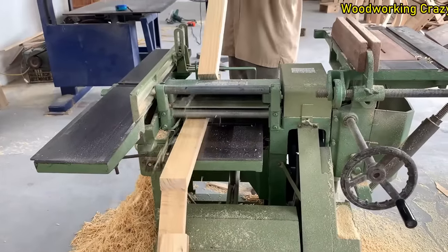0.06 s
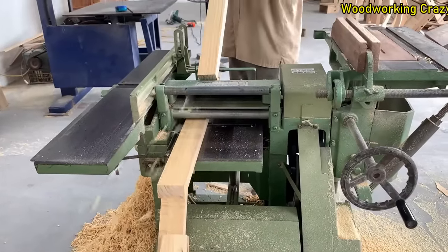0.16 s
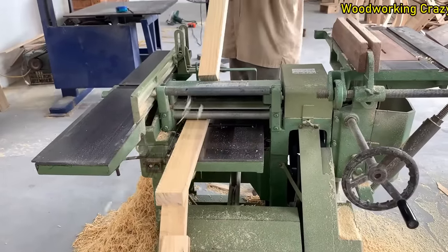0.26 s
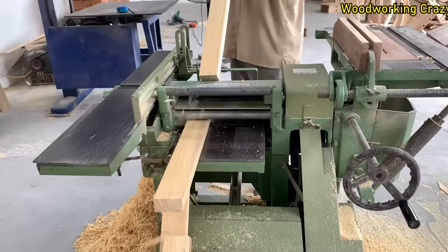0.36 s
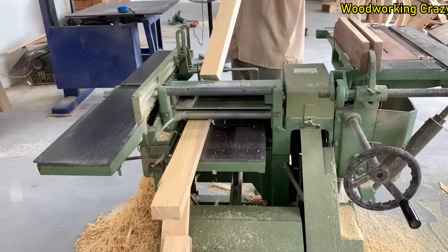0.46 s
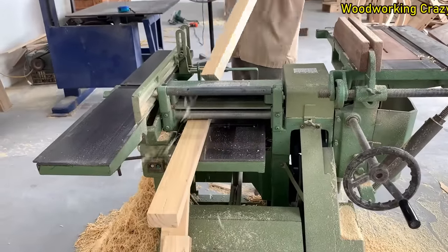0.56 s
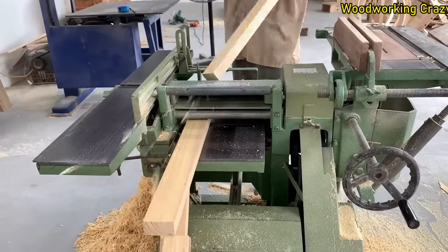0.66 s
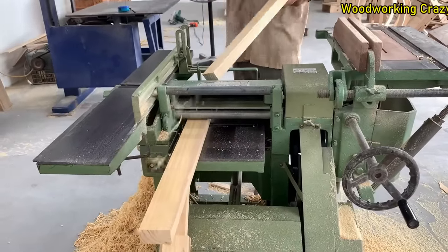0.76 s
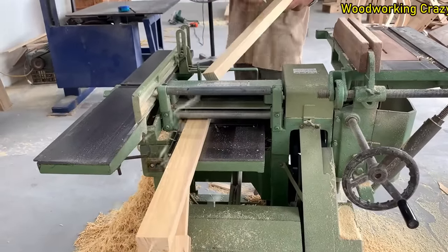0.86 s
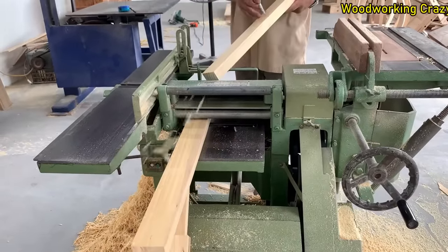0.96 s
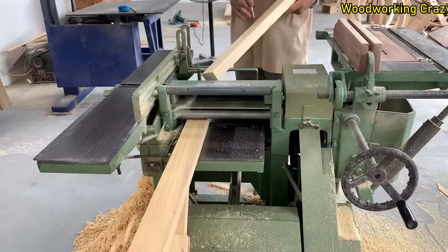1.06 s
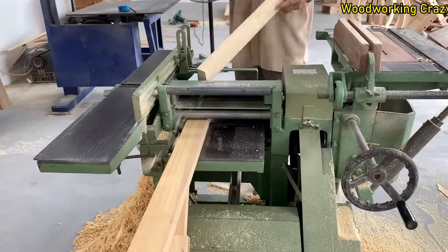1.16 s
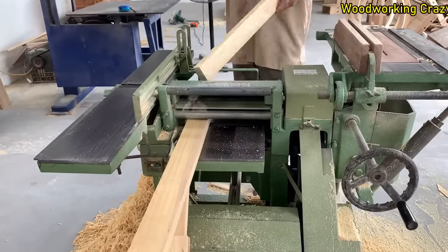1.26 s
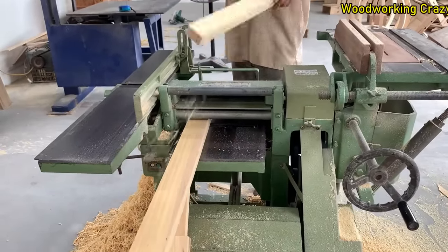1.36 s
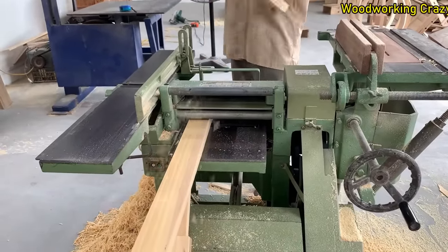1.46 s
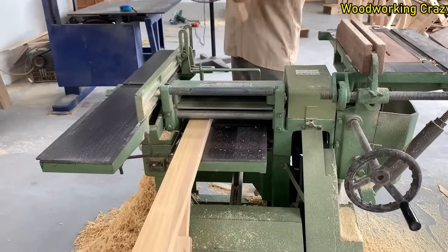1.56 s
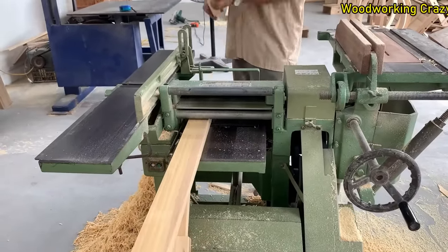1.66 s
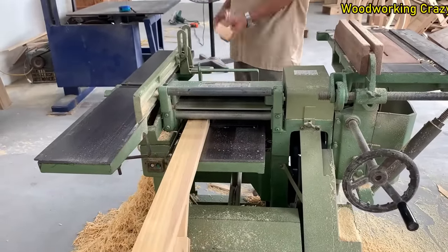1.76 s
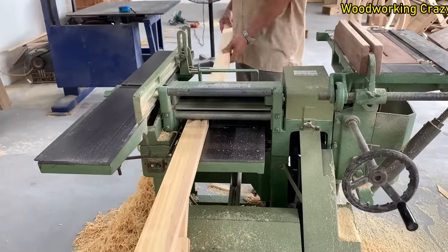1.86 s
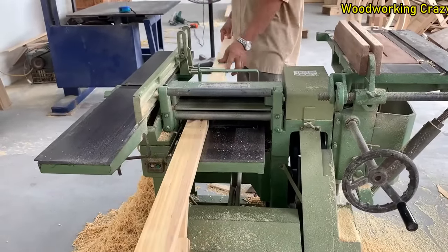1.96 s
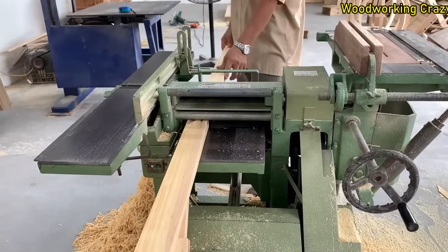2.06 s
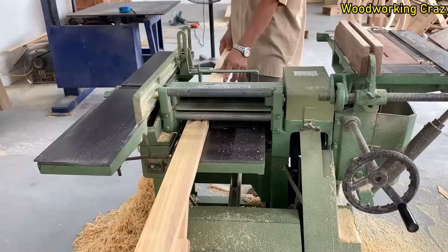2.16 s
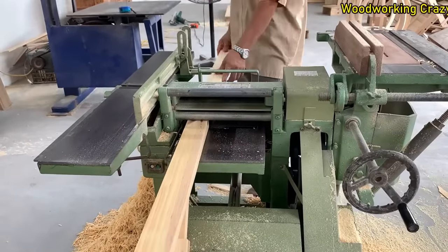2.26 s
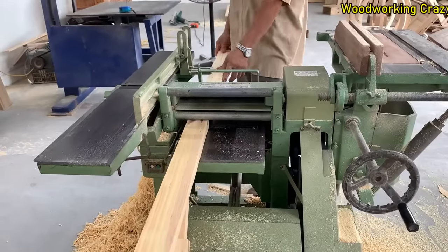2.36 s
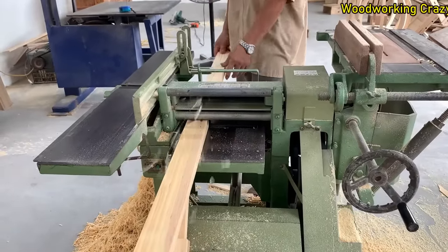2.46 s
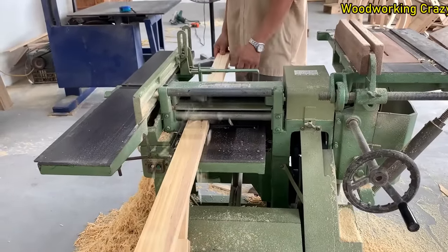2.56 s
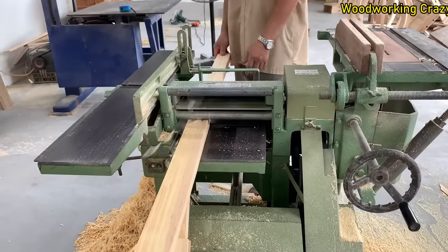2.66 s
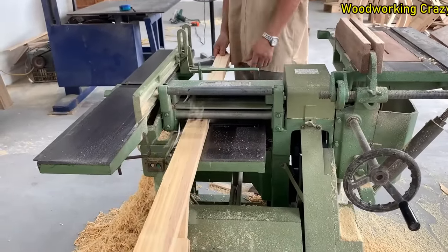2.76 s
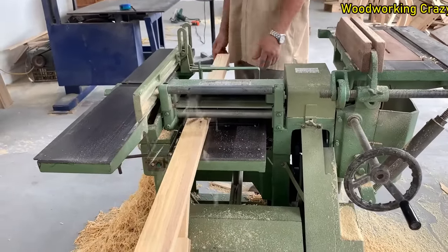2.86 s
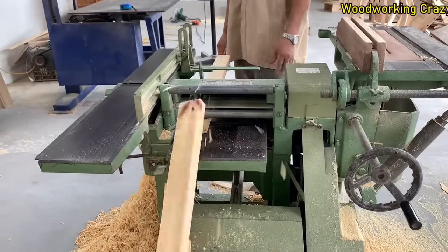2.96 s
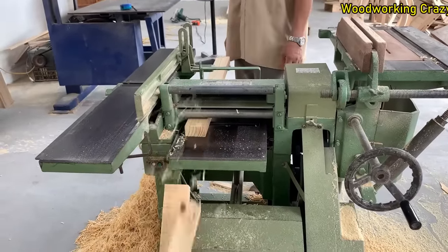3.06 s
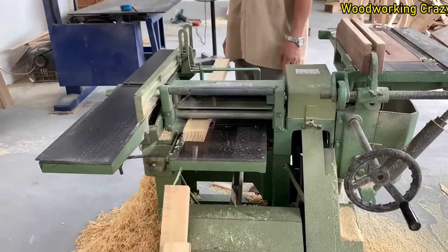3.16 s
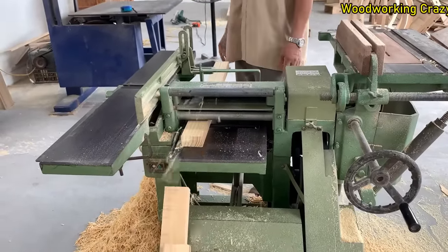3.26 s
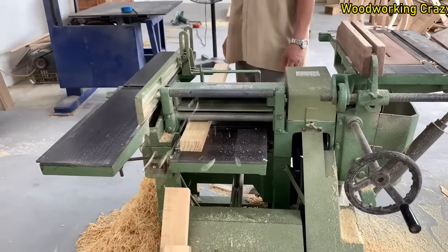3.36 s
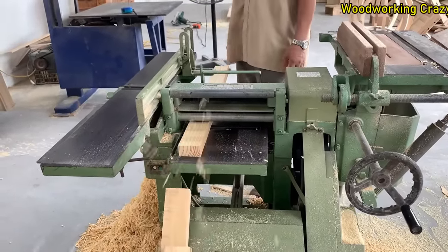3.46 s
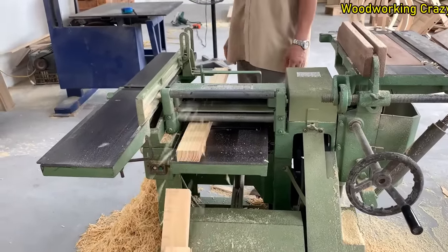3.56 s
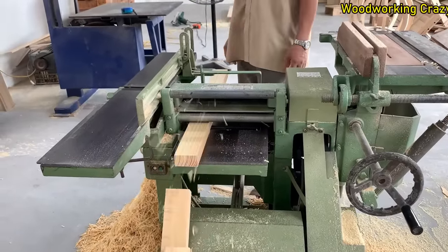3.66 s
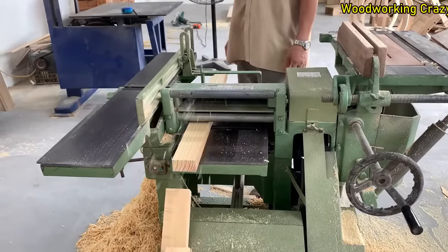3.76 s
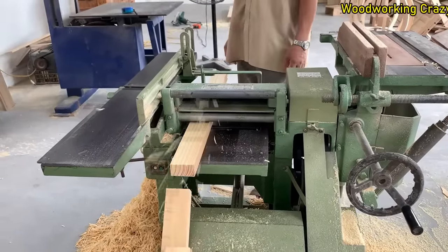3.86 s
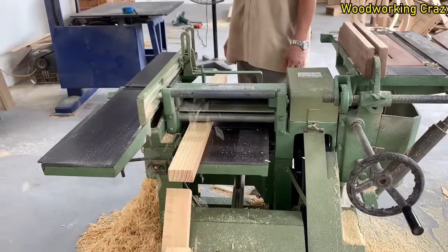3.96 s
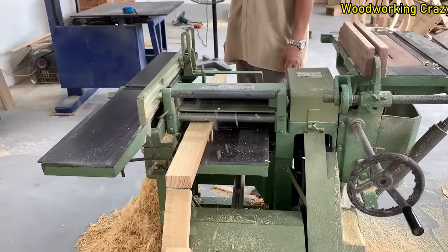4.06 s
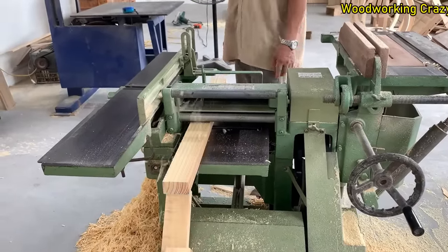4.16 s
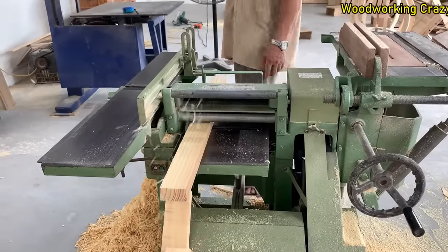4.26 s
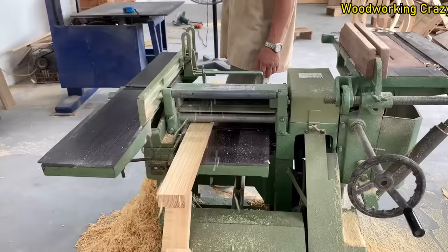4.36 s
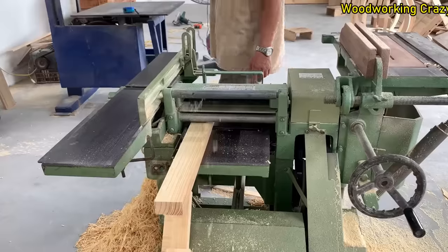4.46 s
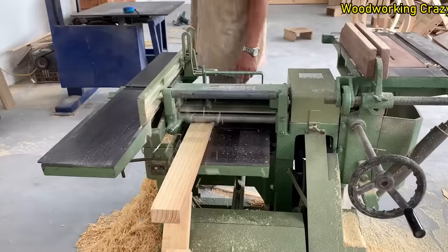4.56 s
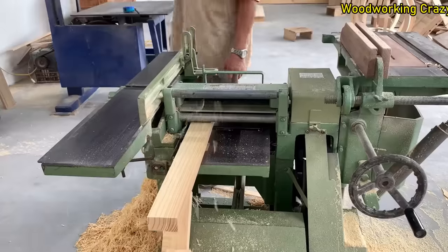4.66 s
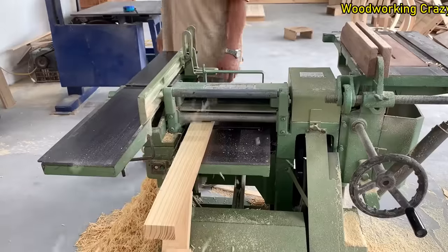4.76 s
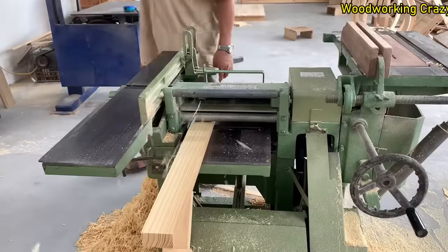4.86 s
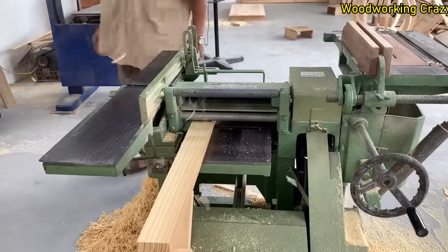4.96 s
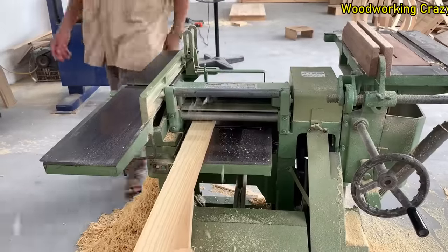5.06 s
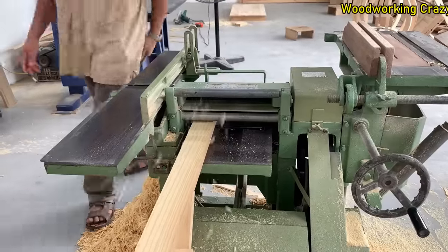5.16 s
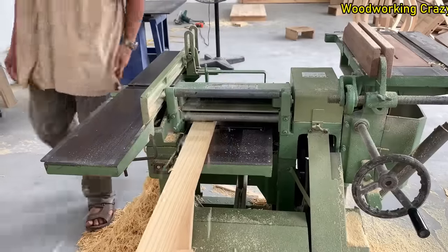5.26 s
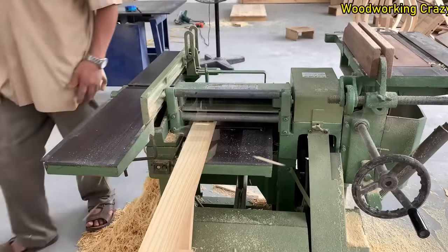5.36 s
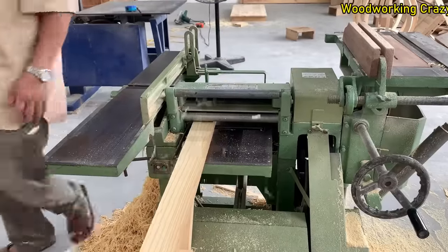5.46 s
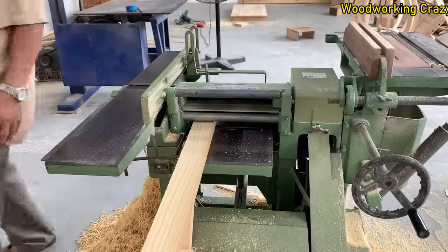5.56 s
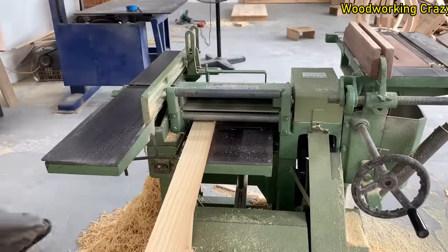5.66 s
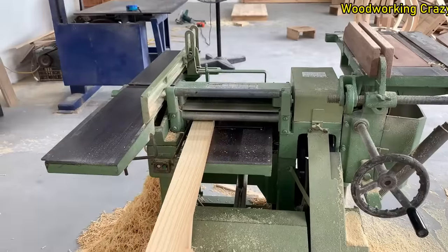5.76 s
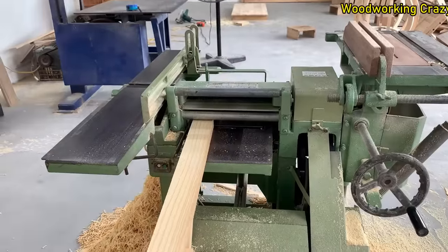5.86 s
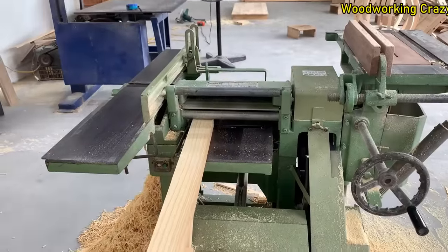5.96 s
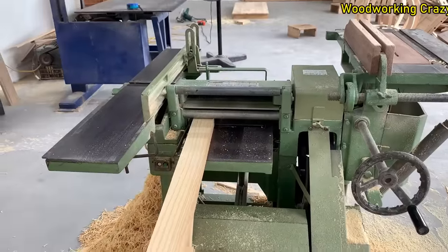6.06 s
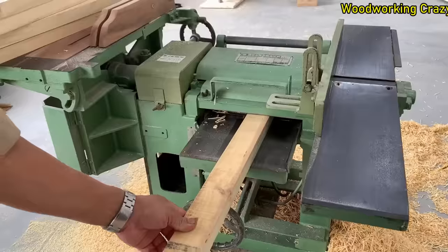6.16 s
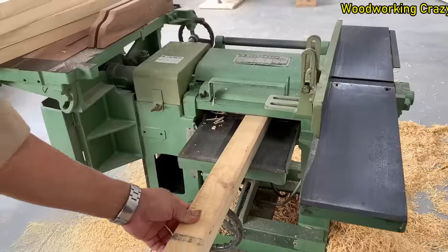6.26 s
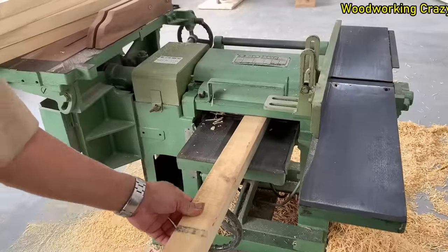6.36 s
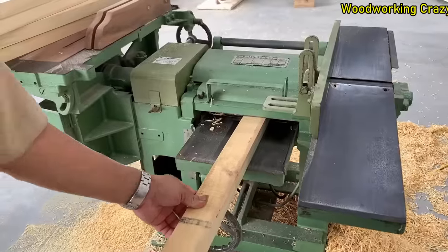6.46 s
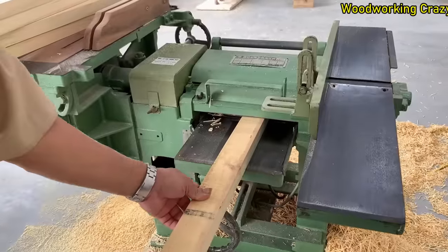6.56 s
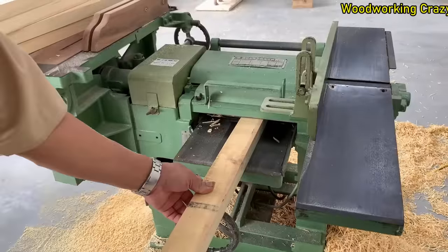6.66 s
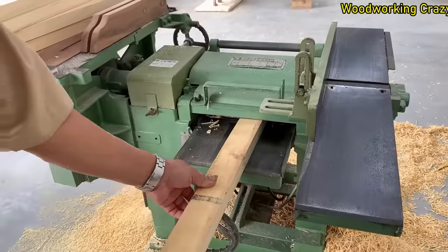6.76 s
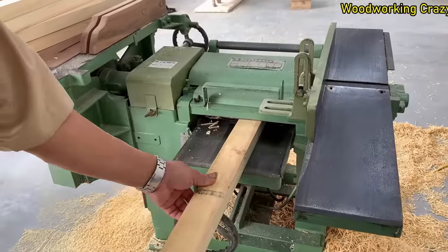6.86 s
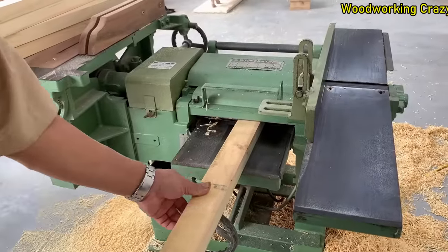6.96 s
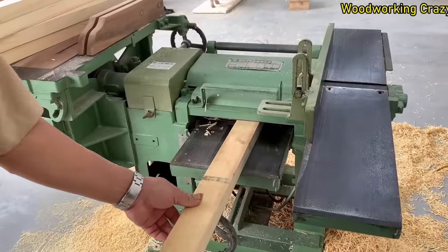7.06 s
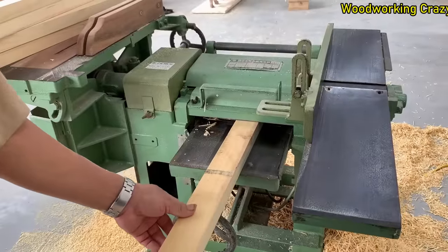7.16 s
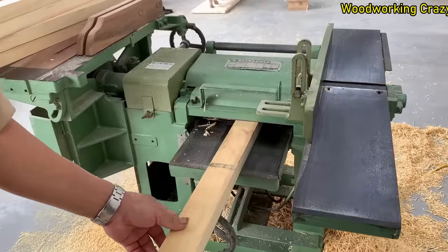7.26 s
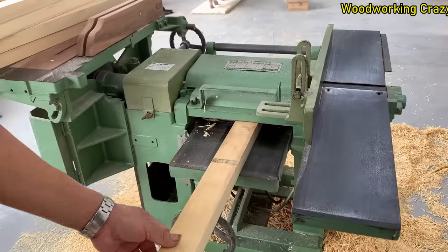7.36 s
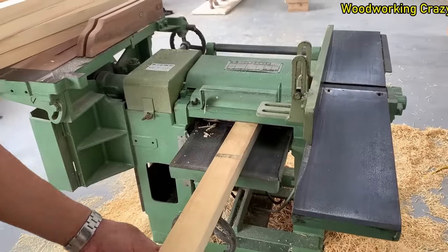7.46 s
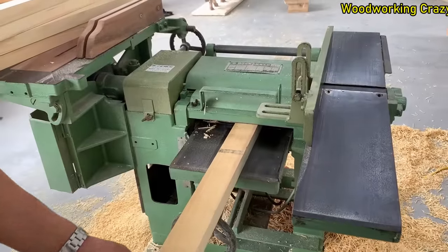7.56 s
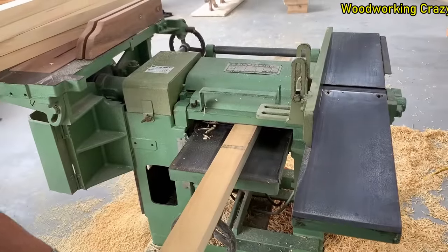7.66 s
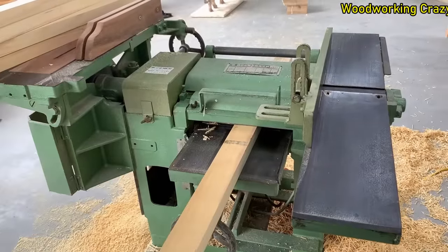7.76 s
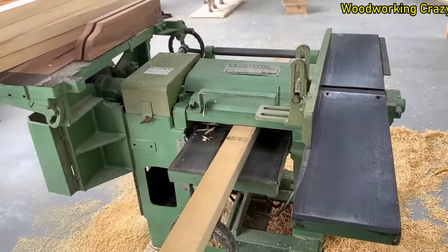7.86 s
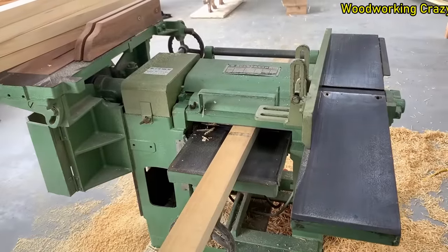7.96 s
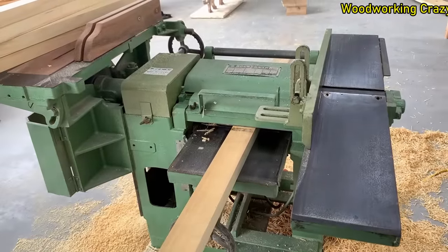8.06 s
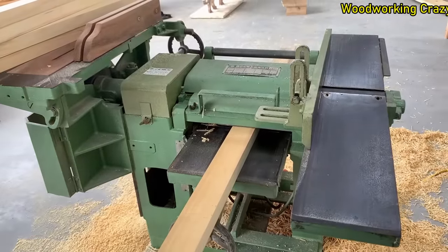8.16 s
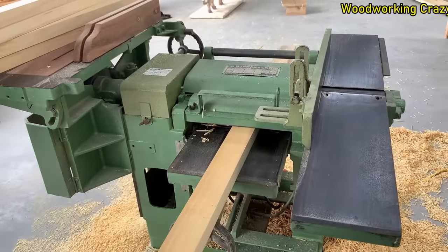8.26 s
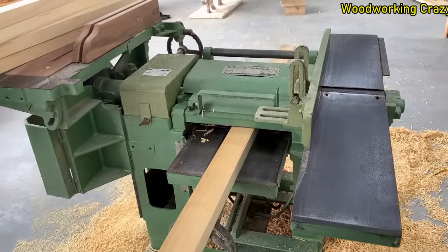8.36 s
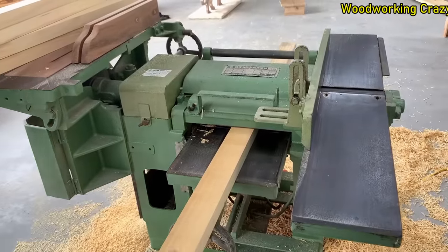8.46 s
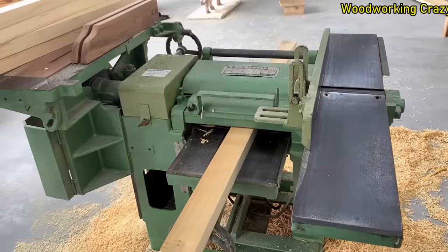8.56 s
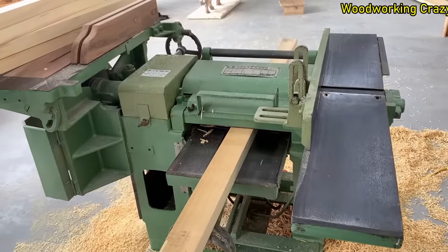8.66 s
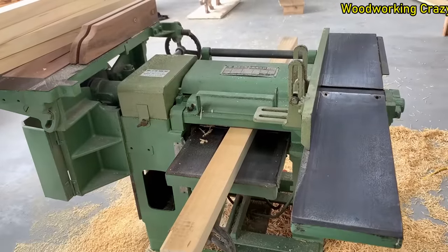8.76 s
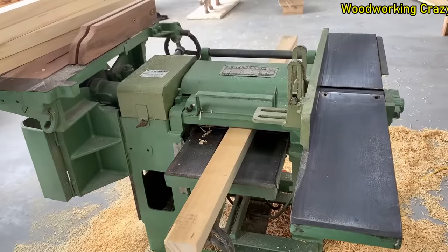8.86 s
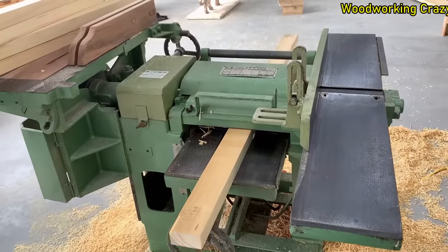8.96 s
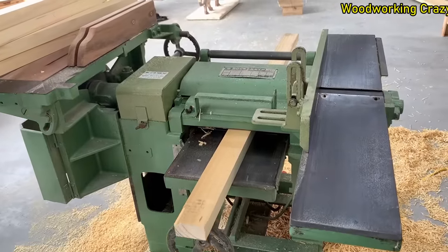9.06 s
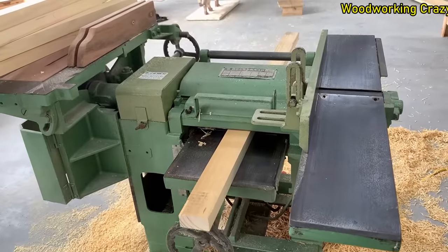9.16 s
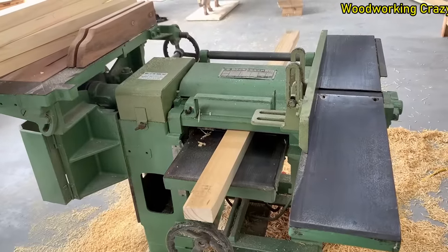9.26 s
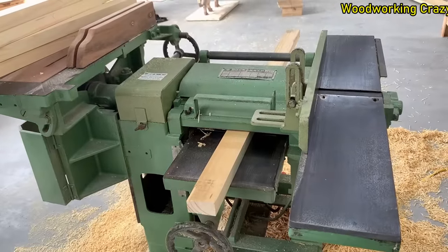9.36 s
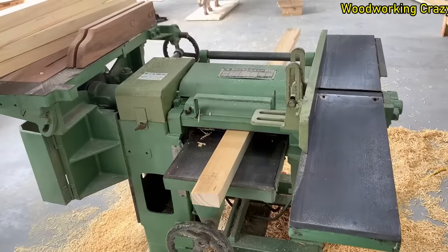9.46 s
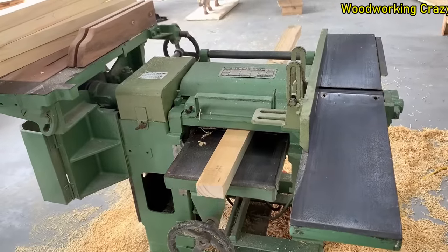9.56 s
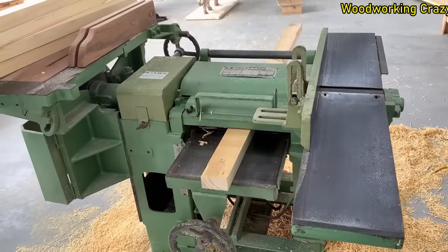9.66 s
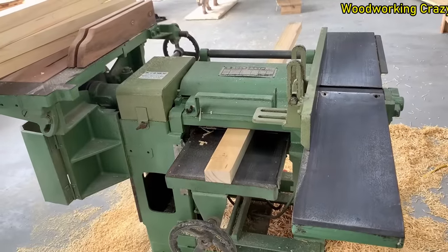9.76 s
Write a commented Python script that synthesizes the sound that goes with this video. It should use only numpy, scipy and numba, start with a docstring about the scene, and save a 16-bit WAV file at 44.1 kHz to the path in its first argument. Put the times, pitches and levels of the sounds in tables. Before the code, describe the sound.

A workshop thickness planer whines steadily as boards pass under its knives, rasping and spraying chips, with drive knocks and wooden clacks.

```python
"""A thicknesser's cutterhead whines at the knife rate in a workshop; in wood its knife strikes ring up to the treble.
Each knife also rasps the board and throws chips, as noise bursts. Heard from the outfeed side, then,
after a short gap, from the infeed side. Behind it: roar as shaped noise, belt and motor hum as wavering tones,
a whistle of the free head, a gritty hiss and thuds of air as filtered noise on the microphone.
The feed drive knocks as noise rung through the frame; boards clack down as contacts ringing wood modes."""
import sys
import numpy as np
from numba import njit
from scipy import signal
from scipy.fft import rfft, irfft, next_fast_len
from scipy.io import wavfile
from scipy.ndimage import uniform_filter1d, map_coordinates

SR = 44100
rng = np.random.default_rng(int(sys.argv[2]) if len(sys.argv) > 2 else 0)


def wav_out(sig):
    """Save sig, one row per channel (or a flat mono array), as 16-bit PCM at SR to the path in sys.argv[1]."""
    wavfile.write(sys.argv[1], SR, np.round(np.clip(np.atleast_2d(sig).T, -1, 1) * 32767).astype(np.int16))


def amplitude_ratio(level_db):
    """Convert a level in decibels to the matching linear amplitude (field) ratio."""
    exponent = np.asarray(level_db, float) / 20
    return 10 ** exponent


N = 433062  # samples

# cutterhead over time: time_s, knife_rate_hz, second_multiple_db, sixth_multiple_db
HEAD = [(0, 227.8, -42, -46), (1.1, 227.4, -42.5, -43), (1.5, 226.8, -41, -38.5), (1.65, 229, -40.5, -41),
        (1.9, 229, -46, -35.5), (2.35, 229.2, -43.5, -34.5), (2.55, 228.3, -38.5, -41),
        (2.8, 228, -38.5, -44), (3.05, 228.2, -42, -46), (3.25, 227.9, -46, -51),
        (4.4, 228.5, -44.5, -45.5), (4.8, 228.1, -45.5, -40), (5.5, 227.9, -42.5, -42),
        (5.75, 230.1, -45.5, -40), (6.21, 230.3, -59, -34.5), (6.23, 228, -47, -54),
        (6.5, 226.9, -48, -41.5), (7.15, 227.3, -45.5, -37.5), (7.7, 226.3, -56, -38.5),
        (7.85, 225.7, -66, -60), (8.07, 223.6, -38, -42), (8.3, 226, -52, -43), (8.5, 226.6, -56, -66),
        (9.0, 227.2, -52, -59), (9.3, 227.3, -56, -45), (9.82, 227, -53, -51)]
# phase by which the left port leads on the whining multiples: multiple, outfeed_rad, infeed_rad
WHINE_LEAD = [(2, -0.66, -0.33), (3, 0.4, -0.0), (4, 0.046, -0.17), (6, 0.75, -2), (8, -0.2, 1.4)]
# other whining multiples: multiple, outfeed_cutting_db, outfeed_free_db, infeed_db, infeed_fade_db_per_s
WHINE = [(3, -46.5, -48.5, -50.5, -0.7), (4, -46.5, -40, -34.5, -2), (8, -44.5, -44, -48, 0)]
# base level of the knife strikes, joined by straight lines: multiple, outfeed_db, infeed_db
STRIKE = [(5, -54, -62), (7, -65, -57), (9, -60, -50), (10, -54, -56), (11, -64, -53), (13, -50, -50),
          (14, -52, -42), (15, -52, -51), (18, -55, -53), (20, -55, -56), (22, -55, -56), (24, -62, -54),
          (27, -55, -53), (30, -59, -56), (33, -56, -53), (35, -60, -58), (36, -52.5, -56), (39, -50, -59),
          (41, -62, -63), (44, -57, -54), (48, -60, -58), (51, -55, -57), (56, -62, -64)]
# boards under the knives: enter_s, leave_s, middle_teeth_db, high_teeth_db
BOARDS = [(-1, 1.59, 0, -1), (2.44, 5.61, 1.5, 3), (6.2, 11, -2, 0)]
# the work over time, relative levels: time_s, roar_db, chip_spray_db, rasp_db
WORK = [(0, -34, -35, -43), (1, -34, -36, -41), (1.3, -33, -33, -42), (1.6, -33.5, -32, -49),
        (2.44, -32, -30.5, -38), (2.75, -32.5, -34, -37), (2.95, -32.5, -30.5, -41), (3.15, -36, -41, -43),
        (3.4, -37.5, -39, -43), (4.5, -36.5, -36, -41.5), (5.35, -35.5, -32.5, -39), (5.6, -33.5, -34, -39),
        (6.2, -31.5, -34, -45), (6.24, -33.5, -32.5, -35.5), (6.45, -33, -31, -39), (7.4, -33, -35, -39.5),
        (7.7, -33.5, -30.5, -39), (8.05, -32.5, -33, -36.5), (8.3, -32, -28, -39), (8.9, -32.5, -33.5, -39),
        (9.1, -33, -37, -37.5), (9.4, -33.5, -38, -33), (9.82, -31.5, -39, -41)]
# groups of teeth that screech for a while: start_s, end_s, centre_hz, half_width_hz, lift_db
SCREECH = [(2.439, 2.543, 8400, 900, 11), (2.55, 2.75, 3680, 200, 8), (2.56, 2.758, 6100, 400, 9),
           (2.64, 2.837, 4540, 450, 7), (2.85, 3.0, 6195, 300, 8), (5.259, 5.36, 8300, 498, 5),
           (5.26, 5.43, 5050, 200, 9), (5.33, 5.46, 4080, 400, 6), (5.36, 5.45, 2870, 250, 12),
           (5.47, 5.58, 4500, 700, 5), (6.227, 6.325, 4700, 220, 10), (6.23, 6.39, 3640, 150, 11),
           (6.24, 6.33, 6000, 350, 4), (8.055, 8.11, 3370, 149.9, 8), (7.53, 7.72, 6000, 400.6, 7.5),
           (8.0, 9.1, 5900, 300, 4), (9.3, 9.7, 5400, 300, 5), (9.33, 9.5, 4130, 200, 6)]
# relative spectrum of casing and air roar: pitch_hz, outfeed_db_per_hz, infeed_db_per_hz
ROAR = [(40, -35, -36), (80, -42, -34), (140, -25.5, -14), (250, -22.5, -16), (426, -12.5, -13.5),
        (820, -10.5, -9), (1070, -9.5, -12), (1930, -8, -9.5), (2380, -9.5, -12), (2880, -6, -7),
        (4020, -10, -12), (5200, -11.5, -12.5), (5900, -14.5, -10.5), (9100, -19, -24.5),
        (13200, -19.5, -18.5), (15200, -11.5, -15), (15900, -26, -16)]
# relative spectrum of the flying chips: pitch_hz, level_db_per_hz
SPRAY = [(3000, -23), (5000, -29), (7000, -0.5), (8500, 1), (10000, -1.5), (12000, 3), (14000, 0),
         (15800, -4)]
# relative spectrum of the rasp on the board: pitch_hz, level_db_per_hz
RASP = [(1500, -29), (3000, 1), (4200, -5.5), (5500, 1.5), (6400, -3.5), (7500, -38), (10000, -35)]
# likeness of noise at the two ports: pitch_hz, correlation
LIKENESS = [(60, .1), (130, 0.35), (290, 0.67), (640, 0.75), (1400, 0.42), (3100, 0.42), (6800, 0.083),
            (12000, 0.29)]
# belt and motor tones, mean levels: pitch_hz, outfeed_db, infeed_db
HUM = [(195.4, -70, -66), (260.5, -62, -61), (325.6, -66, -64), (521, -51.5, -60), (586, -58, -60),
       (765, -56, -54), (838, -57, -57), (1210, -58, -63), (1722, -54, -58)]
# runs of feed drive knocks, relative levels: first_s, last_s, first_db, last_db
KNOCKS = [(.25, .481, -27, -20.5), (.604, .604, -16.5, -17.5), (.9494, 1.4042, -25, -19.5),
          (1.491, 1.491, -19, -18.5), (2.3101, 2.3101, -22.5, -35), (2.523, 2.523, -31, -25),
          (3.3134, 3.8931, -23.5, -20), (4.0098, 4.2438, -20, -23.5), (4.702, 4.9305, -23.5, -26),
          (5.125, 5.125, -26, -26), (5.3394, 5.3394, -22.5, -20), (5.6793, 5.7857, -19.5, -20),
          (6.174, 6.1738, -21, -20.5), (8.0524, 8.1405, -20, -24)]
# resonances of the machine frame: pitch_hz, width_hz, level_db
FRAME = [(1240, 370, -4), (1780, 390, 2), (2426, 300, 2), (2920, 240, 0), (3154, 1180, 3), (3960, 760, -2),
         (6300, 1570, -3)]
# boards knocking onto the stack:
# start_s, level_db, rattle_hold_s, rattle_t60_s, loudest_ring_hz, crack_over_ring_db
CLACKS = [(9.031, -25.5, .015, 0.099, 1899, -12), (9.134, -8.5, 0.003, .04, 2150, 4),
          (9.141, -11.5, .022, 0.23, 2040, -1), (9.17, -22, .012, 0.27, 1880, -6),
          (9.2365, -13, .004, .04, 3000, 6), (9.238, -14, .035, .16, 3280, -3),
          (9.24, -13, .014, .08, 2100, -5), (9.251, -11.5, .022, 0.3, 1700, -9),
          (9.323, -22, 0.012, .14, 3300, -6), (9.753, -18, .003, 0.051, 3300, 0),
          (9.777, -19, 0.028, .3, 1598, -10)]
# a plank dropping free (loudest_ring_hz counts only where pitch_factor is below 1):
# start_s, level_db, rattle_hold_s, rattle_t60_s, loudest_ring_hz, crack_over_ring_db, pitch_factor
DROPS = [(3.0385, -18, 0, .025, 1750, 14, 1.), (3.0435, -9.5, .006, .06, 3300, 11, 1.),
         (3.11, -25, .015, .1, 3300, 13, 1.), (3.375, -22.5, .006, .035, 1230, 11, .7)]
# modes of the free plank at pitch_factor 1: pitch_hz, level_db, t60_s
PLANK = [(1080, -9, .05), (1723, 6.5, .25), (1795, 5.5, .2), (2100, 2, .025), (2400, 1, .025),
         (2880, 0, .07), (3310, 6, .07), (3980, -9, .06), (4555, -8, .08), (5000, -1, .11), (5350, -4, .06),
         (6200, -1, .04), (7600, -3, .05)]
# modes of the stack: pitch_hz, level_db, t60_s
STACK = [(1566, -5, 0.06), (1720, 1, 0.05), (1880, -1.5, 0.045), (2050, 1.5, 0.04), (2280, -3, 0.03),
         (2510, -1.5, 0.018), (2730, -3.5, .02), (3230, 2.5, 0.035), (3410, -1, .045), (4110, -4, 0.036),
         (5370, -4, .02), (6260, 0, .02)]
# thuds of air: start_s, relative_level_db, centre_hz
PUFFS = [(6.624, -29, 320.4), (6.665, -37, 140), (6.75, -32, 331), (7.075, -40, 149.5), (7.288, -29, 299),
         (7.51, -30.5, 179.5), (7.76, -30.5, 300.4), (7.79, -37, 170.2), (8.208, -33.5, 148.6),
         (8.248, -32, 315), (8.453, -32.5, 323.2), (8.516, -31, 365), (8.578, -37.5, 188),
         (8.913, -34, 278), (8.963, -34, 200), (9.016, -35, 306.4), (9.54, -33.5, 266),
         (9.613, -31.5, 254.4), (9.679, -32, 276.6)]
# left port over right: pitch_hz, balance_db
BALANCE = [(100, 0.5), (350, -2), (800, -0.7), (1500, -.4), (3000, 1), (6000, 1), (10000, -0.7),
           (14000, -.8)]

GAP_START_S, GAP_END_S, GAP_DB = 6.212, 6.2295, -28  # the dip between the two standpoints
OUTFEED_PAN_DB, INFEED_PAN_DB = -0.84, 0.1  # left over right
PORT_LAG_S = 1.9e-5
STEP = 256  # samples between control points
T = np.arange(N) / SR
INFEED = T > (GAP_START_S + GAP_END_S) / 2
CONTROL_T, CONTROL_INFEED = T[::STEP], INFEED[::STEP]
FFT_SIZE = next_fast_len(N)
SPECTRUM_HZ = np.arange(FFT_SIZE // 2 + 1) * SR / FFT_SIZE + 1  # 1 Hz up, so that its log exists


def slow(rate, count=1, step=1):
    """Smooth random levels with spread about 1, changing about rate times a second."""
    knots = rng.standard_normal((count, int(N / SR * rate) + 3))
    smooth = (knots[:, 1:] + knots[:, :-1]) / np.sqrt(2)
    places = np.arange(smooth.shape[1])
    return np.squeeze([np.interp(T[::step] * rate, places, row) for row in smooth])


def unit(x):
    """Scale to rms 1."""
    return x / np.sqrt(np.mean(x ** 2))


def back(spectrum):
    """Spectrum to sound."""
    return irfft(spectrum, FFT_SIZE)[:, :N]


def add(out, start_s, sound):
    """Mix a short sound in at its start time."""
    start = int(start_s * SR)
    out[:, start:start + sound.shape[1]] += sound[:, :N - start]


def colour(points):
    """Gain over SPECTRUM_HZ, joined in dB over log frequency."""
    hz, db = np.transpose(points)
    return amplitude_ratio(np.interp(np.log(SPECTRUM_HZ), np.log(hz), db))


def port_noise():
    """Spectra of white noise at the two microphone ports, as alike in each band as LIKENESS says."""
    hz, likeness = np.transpose(LIKENESS)
    like = np.clip(np.interp(np.log(SPECTRUM_HZ), np.log(hz), likeness), 0, 1)
    shape = (2, len(SPECTRUM_HZ))
    mid, side = rng.standard_normal(shape) + 1j * rng.standard_normal(shape)
    sign = np.array([[1], [-1]])
    lag = np.exp(1j * np.pi * SPECTRUM_HZ * PORT_LAG_S * sign)  # the right port hears it later
    return (np.sqrt((1 + like) / 2) * mid + np.sqrt((1 - like) / 2) * side * sign) * lag


def ringing(modes):
    """Noise heard through a set of resonances."""
    gain = sum(amplitude_ratio(db) / (1 + 2j * (SPECTRUM_HZ - hz) / width) ** 2 for hz, width, db in modes)
    return unit(back(port_noise() * gain))


def patchy(x, share=1):
    """Resonances shift as a board travels: each stretch of the spectrum swells and sinks on its own."""
    patch_hz, patches_per_s, depth_db = 600, 6, 3.5
    hz, t, z = signal.stft(x, SR, nperseg=512)
    field = rng.standard_normal((int(hz[-1] / patch_hz) + 2, int(t[-1] * patches_per_s) + 2))
    places = np.meshgrid(hz / patch_hz, t * patches_per_s, indexing="ij")
    db = share * depth_db * map_coordinates(field, places, order=1)
    return unit(signal.istft(z * amplitude_ratio(db), SR, nperseg=512)[1][:, :N])


def grit(size, spread_db):
    """Gains of single small contacts, a few much harder than the rest."""
    hold = int(0.0012 * SR)  # length of one contact
    hardness_db = spread_db * rng.exponential(size=size // hold + 1)
    return np.repeat(amplitude_ratio(np.minimum(hardness_db, 3 * spread_db)), hold)[:size]


def blows(rows, rise_s, t60_s):
    """Envelope of (start_s, level_db) blows: quick rise, exponential fall."""
    env = np.zeros(N)
    for start_s, db in rows:
        start = int(start_s * SR)
        t = T[start:int((start_s + 1.5 * t60_s) * SR)] - start_s
        env[start:start + len(t)] += amplitude_ratio(db - 60 * t / t60_s) * (1 - np.exp(-t / rise_s))
    return env


def pair(db, lead):
    """Complex gain of a tone of this rms level at both ports, the left ahead by lead radians."""
    return np.sqrt(2) * amplitude_ratio(db) * np.exp(.5j * np.array([lead, -lead]))


@njit(fastmath=True)
def comb(phase, gains, step):
    """Sum of multiples of a phase; complex gains[control point, port, multiple - 1] glide between points."""
    out = np.zeros((2, len(phase)))
    for i in range(len(phase)):
        j = min(i // step, len(gains) - 2)
        share = i / step - j
        turn = np.exp(1j * phase[i])
        z = turn
        for k in range(gains.shape[2]):
            for c in range(2):
                out[c, i] += (z * (gains[j, c, k] + share * (gains[j + 1, c, k] - gains[j, c, k]))).imag
            z *= turn
    return out


def roar(roar_db):
    """Wind of the head, bearings and casing: bands that flicker apart; the bass flickers and swells most."""
    white = port_noise()
    swell = 0.27 * (roar_db - roar_db.mean())
    out = 0
    for column, side in ((1, ~INFEED), (2, INFEED)):
        shaped = white * colour(np.array(ROAR)[:, [0, column]])
        for centre_hz, flicker_db in [(60, 7.5), (240, 1.6), (960, .9), (3840, .8)]:
            octaves = np.log2(np.minimum(SPECTRUM_HZ, 3840) / centre_hz)  # the last band takes all the treble
            band = np.cos(np.pi / 2 * np.clip(octaves / 2, -1, 1)) ** 2
            out = out + side * back(shaped * band) * amplitude_ratio(flicker_db * (slow(7) + swell))
    return unit(out) * amplitude_ratio(roar_db + 3.0)


def hum():
    """Belt and motor tones, slightly wavering in level and phase, alike at both ports."""
    def waver(rate):
        return np.repeat(slow(rate, count=len(HUM), step=STEP), STEP, axis=1)[:, :N]

    out = 0
    for (hz, outfeed_db, infeed_db), level, drift in zip(HUM, waver(4), waver(6)):
        db = np.where(INFEED, infeed_db, outfeed_db) + 3.2 * level
        phase = 2 * np.pi * hz * T + 1.12 * uniform_filter1d(drift, size=STEP)
        out = out + np.sqrt(2) * amplitude_ratio(db) * np.sin(phase)
    return out


def whistle(in_wood):
    """The free-running head whistles: noise in one narrow resonance, silent while a board is cut."""
    tone = ringing([(10880, 60, 0)])  # pitch_hz, width_hz, level_db
    return (1 - in_wood) * tone * amplitude_ratio(-57 + 3.9 * slow(7.7))


def hiss():
    """Gritty noise in one broad resonance swells, holds and stops."""
    start_s, end_s, rise_s = 5.5, 6, 0.14
    noise = ringing([(4000, 3000, 0)]) * unit(grit(N, 2))  # pitch_hz, width_hz, level_db
    return noise * amplitude_ratio(-32 + 2 * slow(11)) * np.clip((T - start_s) / rise_s, 0, 1) * (T < end_s)


def puffs():
    """Short low thuds of air: band noise with a quick rise and exponential fall, each with its own centre."""
    out, t = np.zeros((2, N)), np.arange(SR // 6) / SR
    envelope = amplitude_ratio(-60 * t / 0.15) * (1 - np.exp(-t / 0.0065))
    for start_s, db, hz in PUFFS:
        air = 0.79 * rng.standard_normal(len(t)) + 0.32 * rng.standard_normal((2, len(t)))
        band = signal.butter(2, [0.56 * hz, 1.56 * hz], "band", fs=SR, output="sos")
        add(out, start_s, unit(signal.sosfilt(band, air) * envelope) * amplitude_ratio(db - 12))
    return out


def knocks():
    """Each chain link strikes the frame: a tick, then a gritty ring; loose chips tick on it at the outfeed."""
    beat_s, ticks_per_s, tick_db, spread_db = 0.115, 100, -41, 2.5
    rows = []
    for first_s, last_s, first_db, last_db in KNOCKS:
        count = round((last_s - first_s) / beat_s) + 1
        rows.extend(np.linspace((first_s, first_db), (last_s, last_db), count))
    when, chance = rng.random((2, int(ticks_per_s * GAP_START_S)))
    ticks = np.transpose([when * GAP_START_S, tick_db - spread_db * np.log(chance + 0.069)])
    links = blows(rows, 0.0022, 0.25) * amplitude_ratio(-8.0) + blows(rows, 0.00023, 0.052) * amplitude_ratio(-13)
    links = links * unit(grit(N, spread_db / 2))
    return patchy(ringing(FRAME), share=.5) * (links + blows(ticks, 0.0006, 0.055))


def struck_wood(modes, free, hold_s, t60_s, loudest_hz, crack_db, factor):
    """A gritty rattle of contacts cracks out and drives decaying modes; a free plank cracks wider."""
    t = np.arange(SR // 4) / SR
    noise = rng.standard_normal(len(t)) + 1.47 * rng.standard_normal((2, len(t)))
    fall = amplitude_ratio(-60 * np.maximum(t - hold_s, 0) / t60_s)
    contacts = noise * grit(len(t), 2.2) * fall * (1 - np.exp(-t / 0.0006))
    drive = contacts.copy()
    if free:  # one firm blow sets a free plank ringing
        drive[:, int(hold_s * SR)] += np.sqrt(np.mean(np.sum(contacts ** 2, axis=1)))
    focus_db_per_octave = 11 if factor < 1 or not free else 0  # modes fall off away from the loudest
    ring = 0
    for mode_hz, mode_db, ring_s in modes:
        hz, decay_s = mode_hz * factor, ring_s * factor ** 2
        pole = np.exp(2j * np.pi * hz / SR - np.log(1000) / (decay_s * SR))
        gain = amplitude_ratio(mode_db - focus_db_per_octave * abs(np.log2(hz / loudest_hz)))
        ring = ring + gain * np.sqrt(1 - abs(pole)) * signal.lfilter([1], [1, -pole], drive).imag
    crack_band = signal.butter(3, (900, 7000) if free else (1700, 4600), "band", fs=SR, output="sos")
    low_cut = signal.butter(6, 700 if free else 1500, "high", fs=SR, output="sos")
    sound = signal.sosfilt(low_cut, ring + amplitude_ratio(crack_db) * signal.sosfilt(crack_band, contacts))
    return sound / np.sqrt(uniform_filter1d(sound ** 2, size=440).max())  # loudest 10 ms at rms 1


def clacks():
    """A plank drops free and boards knock onto the stack, each ringing the modes of what is struck."""
    out = np.zeros((2, N))
    for start_s, db, *blow in DROPS:
        add(out, start_s, amplitude_ratio(db - 5.5) * struck_wood(PLANK, True, *blow))
    for start_s, db, *blow in CLACKS:
        add(out, start_s, amplitude_ratio(db - 5.5) * struck_wood(STACK, False, *blow, 1))
    return out


def chips(phase, spray_db, rasp_db):
    """Each knife rasps the board and throws a burst of chips, a few cuts much heavier than the rest."""
    cuts = phase / (2 * np.pi)
    cut = cuts.astype(int)
    heavy = amplitude_ratio(np.minimum(3.2 * rng.exponential(size=cut[-1] + 1), 11.5))[cut]
    burst = unit(0.5 + heavy * np.exp(-(cuts % 1) / 0.34))
    white = port_noise()
    spray, rasp = (patchy(back(white * colour(points))) for points in (SPRAY, RASP))
    return burst * (spray * amplitude_ratio(spray_db + 1.9 * slow(8)) + rasp * amplitude_ratio(rasp_db + 1.4 * slow(9)))


def groan_db(k):
    """Least level of a multiple: a knot makes the head groan on multiples 8 to 12."""
    knot_s, half_s = 8.07, 0.085
    return -40.5 - 6 * ((CONTROL_T - knot_s) / half_s) ** 4 if 8 <= k <= 12 else -99


def screech_db(tooth_hz):
    """Lift of a tooth while a group of teeth around it screeches."""
    lift_db = 0
    for start_s, end_s, centre_hz, half_width_hz, db in SCREECH:
        gate = np.clip(np.minimum(CONTROL_T - start_s, end_s - CONTROL_T) / .03 + .5, 0, 1)
        lift_db = lift_db + db * np.exp(-((tooth_hz - centre_hz) / half_width_hz) ** 2) * gate
    return lift_db


def air_whine(in_wood, roar_db):
    """Levels of the air whine by multiple; on the outfeed side three of them change as boards enter and leave."""
    settle_s, db_per_roar_db = 0.3, 0.92
    cutting = uniform_filter1d(1. * in_wood, size=int(settle_s * SR))[::STEP]
    swell_db = db_per_roar_db * (roar_db - roar_db.mean())[::STEP]
    time_s, _, second_db, sixth_db = np.transpose(HEAD)
    levels = {2: np.interp(CONTROL_T, time_s, second_db), 6: np.interp(CONTROL_T, time_s, sixth_db)}
    for k, cut_db, free_db, infeed_db, fade in WHINE:
        outfeed = free_db + cutting * (cut_db - free_db + swell_db)
        infeed = infeed_db + fade * (CONTROL_T - GAP_END_S)
        levels[int(k)] = np.where(CONTROL_INFEED, infeed, outfeed)
    return levels


def cutterhead(in_wood, roar_db, rasp_db, spray_db):
    """Air whine on low multiples of the knife rate; in wood a full comb whose teeth drift as the board travels."""
    time_s, knife_hz, *_ = np.transpose(HEAD)
    phase = 2 * np.pi * np.cumsum(np.interp(T, time_s, knife_hz) * (1 + .0002 * slow(30))) / SR
    gains = np.zeros((len(CONTROL_T), 2, int(STRIKE[-1][0])), complex)

    whine = air_whine(in_wood, roar_db)
    for k, outfeed_lead, infeed_lead in WHINE_LEAD:
        k = int(k)
        db = np.maximum(whine[k], groan_db(k)) + 1.4 * slow(14, step=STEP)
        gains[:, :, k - 1] = pair(db, np.where(CONTROL_INFEED, infeed_lead, outfeed_lead)).T

    boards = np.array(BOARDS)
    board = boards[np.searchsorted(boards[:, 0], CONTROL_T) - 1]  # the last to enter
    # middle teeth grow with the rasp, high teeth with the spray, from their usual levels
    middle_db = 1.4 * (rasp_db[::STEP] + 41) + board[:, 2]
    high_db = 0.4 * (spray_db[::STEP] + 35) + board[:, 3]
    multiple, *sides_db = np.transpose(STRIKE)
    for k in sorted(set(range(int(multiple[0]), int(multiple[-1]) + 1)) - set(whine)):
        parity_db = 2.5 * (.5 - k % 2) - 2 * (k in (16, 17))  # even multiples stand above odd ones
        outfeed_db, infeed_db = (np.interp(k, multiple, side) + parity_db for side in sides_db)
        db = np.where(CONTROL_INFEED, infeed_db, outfeed_db)
        if k > 15:
            db = db + (high_db if k > 28 else middle_db)
        drift, flutter, turn = slow(6, step=STEP), slow(16, step=STEP), slow(2.5, step=STEP)
        lift_db = screech_db(k * knife_hz[0])
        loose = amplitude_ratio(-lift_db)  # a screeching tooth holds steadier
        db = db + lift_db + (3.2 if k > 15 else 1.6) * drift * loose
        db = np.maximum(np.minimum(db, -40), groan_db(k)) + 2 * flutter
        # the ports hear each tooth by different paths
        lead = np.where(CONTROL_INFEED, 0.75 * turn, 0.03 * k + 0.49 * turn) * np.sqrt(loose)
        # teeth nearly in step add up to a blow per knife; each wavers
        waver = np.exp(2.4j * rng.random() + (.3j + .012j * k) * slow(25, step=STEP))
        gains[:, :, k - 1] = (in_wood[::STEP] * pair(db, lead) * waver).T
    return comb(phase, gains, STEP), phase


def scene():
    """The machine, its boards and the gap between the standpoints."""
    time_s, *columns = np.transpose(WORK)
    roar_db, spray_db, rasp_db = (np.interp(T, time_s, column) for column in columns)
    in_wood = sum(np.clip(np.minimum(T - enter_s, leave_s - T) / .02, 0, 1) for enter_s, leave_s, *_ in BOARDS)
    head, phase = cutterhead(in_wood, roar_db, rasp_db, spray_db)
    background = roar(roar_db) + hum() + whistle(in_wood) + hiss() + puffs()
    out = background + knocks() + clacks() + in_wood * chips(phase, spray_db, rasp_db) + head
    pan_db = np.where(INFEED, INFEED_PAN_DB, OUTFEED_PAN_DB) * np.array([[.5], [-.5]])
    gap = np.where((T > GAP_START_S) & (T < GAP_END_S), amplitude_ratio(GAP_DB), 1)
    return out * amplitude_ratio(pan_db) * gap


def band_limit(x):
    """A steep low-pass at the top of the band."""
    return signal.sosfilt(signal.butter(12, 16810, fs=SR, output="sos"), x)


def record(dry):
    """A gentle bass cut and a steep top limit at 15.75 kHz; the two ports differ a little in colour."""
    tilt = np.sqrt(colour(BALANCE))
    mix = back(rfft(dry, FFT_SIZE) * np.array([tilt, 1 / tilt]))
    mix = signal.sosfilt(signal.butter(2, 90, "high", fs=SR, output="sos"), mix)
    mix = signal.sosfilt(signal.ellip(14, .5, 65, 15750, fs=SR, output="sos"), mix)
    return band_limit(mix)


dry = scene()
out = record(dry)
wav_out(out)
```